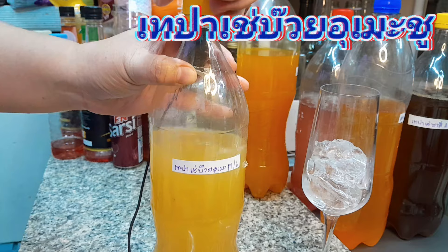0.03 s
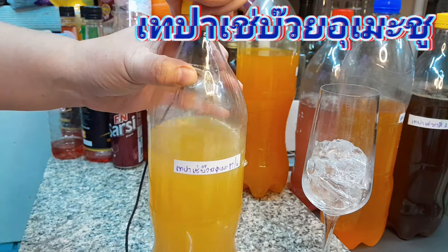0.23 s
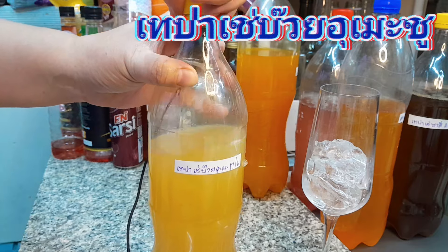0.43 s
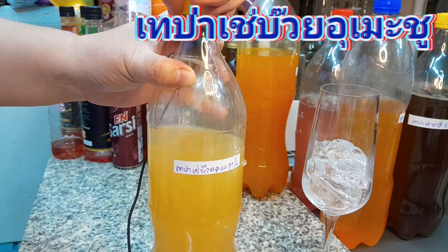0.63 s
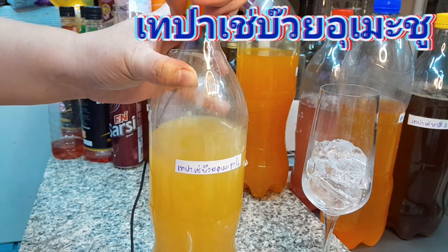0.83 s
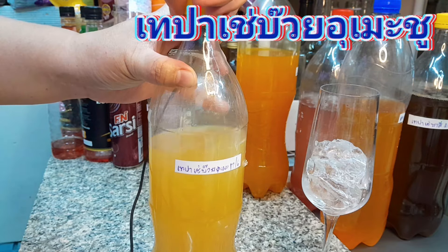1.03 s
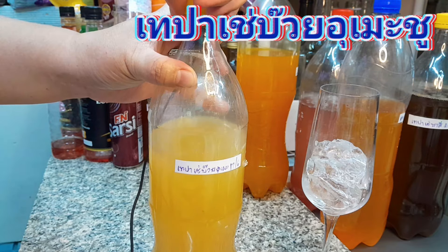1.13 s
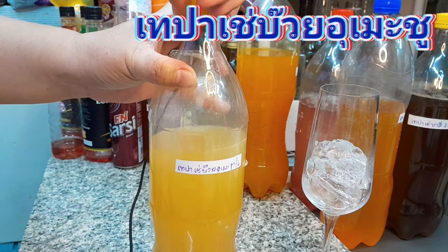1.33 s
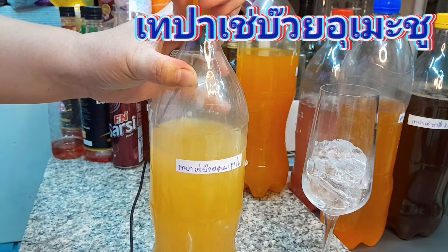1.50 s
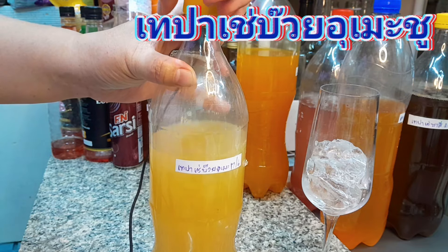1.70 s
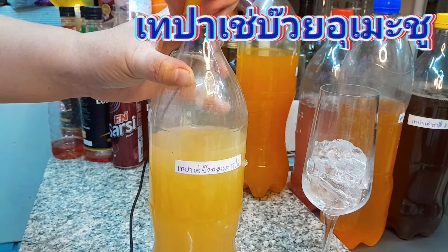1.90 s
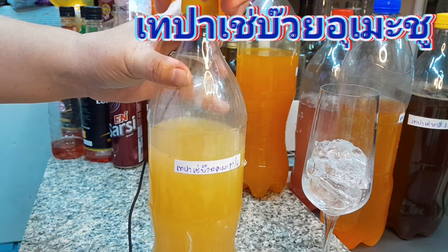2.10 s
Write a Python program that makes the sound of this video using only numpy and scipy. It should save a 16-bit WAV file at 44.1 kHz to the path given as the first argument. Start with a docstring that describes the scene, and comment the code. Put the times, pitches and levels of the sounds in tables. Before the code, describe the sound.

A burst of escaping fizz fades over a second, followed by small plastic clicks up close

```python
"""Gas escapes from a plastic bottle of fizzy drink as its cap is eased open, close to a two-port microphone.
The bottle is on a kitchen counter. Filtered noise with breathy tones makes the jet: it hisses through the
threads, spits a little, dulls as the pressure falls and dies away. Then the plastic ticks (decaying sines
and noise cracks) and rubs under the fingers (noise grains). Low resonances shaken by noise make a rumble
that swells and sinks throughout, and a small hard room answers the ticks."""
import sys
import numpy as np
from scipy import signal
from scipy.fft import rfft, irfft
from scipy.io import wavfile

SR = 44100
rng = np.random.default_rng(int(sys.argv[2]) if len(sys.argv) > 2 else 0)


def persist_wave(psi):
    """Save psi, clipped to +-1, as 16-bit WAV."""
    counts = np.round(np.clip(psi, -1, 1) * 32767).astype(np.int16)
    wavfile.write(sys.argv[1], SR, np.atleast_2d(counts).T)


N = 94903
T = np.arange(N) / SR  # s
HZ = np.maximum(np.arange(N // 2 + 1) * SR / N, 1)  # frequency of each spectrum bin
PORT_LAG_S = .00015  # sound from the bottle reaches the right port this much later


def amp(db):
    """Decibels to gain."""
    return 10 ** (np.asarray(db) / 20)


def unit(x):
    """Scale to an rms of 1."""
    return x / np.sqrt(np.mean(x ** 2))


def curve(table, axis=1):
    """One column of a time table, joined by straight lines."""
    rows = np.array(table)
    return np.interp(T, rows[:, 0], rows[:, axis])


def colour(table, axis=1):
    """Gain at every frequency from a table of Hz and dB, joined along log frequency."""
    rows = np.array(table)
    return amp(np.interp(np.log(HZ), np.log(rows[:, 0]), rows[:, axis]))


def shape(x, gain):
    """Filter by a gain for each frequency."""
    return irfft(rfft(x) * gain, N)


def above(hz):
    """Steep crossover: the share that lies above hz."""
    return 1 / (1 + (hz / HZ) ** 12)


def late(x, lag_s):
    """Delay by any time, even between samples; the end wraps round to the start."""
    return shape(x, np.exp(-2j * np.pi * HZ * lag_s))


def fade(t60, t=T):
    """Decay that loses 60 dB in t60 seconds."""
    return np.exp(-np.log(1000) * t / t60)


def ring(x, response):
    """Play x through an impulse response."""
    return signal.fftconvolve(x, response)[:N]


def pan(db):
    """Left and right gains; positive dB makes the left louder by that much."""
    return amp(np.array([[db], [-db]]) / 2)


def grains(per_s):
    """Sparse random impulses of uneven size."""
    return (rng.random(N) < per_s / SR) * rng.standard_normal(N)


def wide(gain, side_db):
    """Coloured noise: a part alike on both ports (rms 1) plus a part of opposite sign, side_db relative to it."""
    mid, side = shape(rng.standard_normal((2, N)), gain)
    return unit(mid) + amp(side_db) * unit(side) * np.array([[1], [-1]])


# Colour of the still room at the microphone. Each row: frequency in Hz, gain in dB.
FLOOR_COLOUR = [(100, -4), (400, -4), (700, -7.5), (1500, -19), (4000, -21), (7000, -27), (12000, -24),
                (15000, -21)]
FLOOR_DB = -70


def still_air():
    """Steady faint noise, more unlike than alike on the two ports."""
    return amp(FLOOR_DB) * wide(colour(FLOOR_COLOUR), side_db=2)


def throb(hz, width_hz, side_db):
    """A low resonance shaken at random, with its swings in strength partly evened out."""
    resonance = 1 / (1 + ((HZ - hz) / (width_hz / 2)) ** 2)
    low_cut = above(38) ** 2
    x = wide(resonance * low_cut, side_db)
    strength = np.abs(signal.hilbert(x.mean(0)))
    return unit(x / np.sqrt(strength ** 2 + .3))


# Low rumble at the microphone, before the pan.
# Each row: time in seconds, then the levels of the deep, boom and upper bands in dB.
RUMBLE_LEVELS = [(0.0, -33, -34, -58), (0.06, -33.5, -42, -54.5), (0.21, -60.5, -47.5, -56),
                 (0.28, -48, -38, -56), (0.38, -62, -54, -58), (0.48, -40, -47, -55.5),
                 (0.6, -45.5, -41.5, -53.5), (0.78, -47.5, -40.5, -52), (0.95, -54, -56.5, -54.5),
                 (1.17, -51.5, -41.5, -54), (1.45, -47.5, -47, -51.5), (1.56, -61, -65, -68.5),
                 (1.71, -55.5, -47, -55), (1.81, -66, -52.5, -60.5), (1.94, -46, -51, -65.5),
                 (2.06, -67, -65.5, -63), (2.1, -52, -43.5, -52), (2.15, -54, -45.5, -51)]
# Colour of the dull upper band. Each row: frequency in Hz, gain in dB.
RUMBLE_UPPER_COLOUR = [(90, -9.5), (135, 2), (200, -1), (300, -5), (345, -9), (400, -18.5), (700, -22.5),
                       (1500, -34.5), (4000, -49)]


def rumble():
    """Two low resonances and a dull band above them swell and sink."""
    deep = throb(hz=53.2, width_hz=20, side_db=-15) * amp(curve(RUMBLE_LEVELS))
    boom = throb(hz=98, width_hz=13, side_db=-18) * amp(curve(RUMBLE_LEVELS, axis=2))
    upper = wide(colour(RUMBLE_UPPER_COLOUR), side_db=-8.5) * amp(curve(RUMBLE_LEVELS, axis=3))
    return (deep + boom + upper) * pan(db=2.5)


ECHO_T60_S, ROOM_T60_S, ROOM_TREBLE_T60_S = 0.044, 0.13, 0.097


def kitchen(x, echo_db, room_db):
    """Direct sound reaches the left port first; counter and bottles add quick echoes, the walls a short tail."""
    ports = []
    for lag in (0, PORT_LAG_S):
        near, far = rng.standard_normal((2, N))
        near = near * fade(ECHO_T60_S) * (T > .001)
        treble = shape(far, above(4500))
        far = (far - treble) * fade(ROOM_T60_S) + treble * fade(ROOM_TREBLE_T60_S)
        far = far * (T > .006)
        echoes = (amp(echo_db) * unit(near) + amp(room_db) * unit(far)) / np.sqrt(N)
        ports.append(late(x, lag) + ring(x, echoes))
    return np.array(ports) / np.sqrt(1 + amp(echo_db) ** 2 + amp(room_db) ** 2)


HAND_PAN_DB = 6  # ticks and rubbing are louder at the left port

# Skin on the cap, close to the microphone, before the pan. Each row: time in seconds, level in dB.
RUB_LEVEL = [(1.9, -94.5), (1.93, -57.5), (1.99, -61), (2.02, -60), (2.05, -60.5), (2.08, -53.5),
             (2.15, -60)]
# Colour of the rubbing. Each row: frequency in Hz, gain in dB.
RUB_COLOUR = [(300, -6.5), (620, 2), (900, -5), (1900, -9), (2750, -2), (3200, -11.5), (4300, -8.5),
              (5100, -19), (9000, -26.5), (16000, -27.5)]
RUB_GRAINS_PER_S, RUB_HISS_DB = 2500, -4  # hiss relative to the grains


def fingers():
    """Skin drags over the ribs of the cap: fine grains on a soft hiss."""
    drag = unit(grains(RUB_GRAINS_PER_S)) + amp(RUB_HISS_DB) * rng.standard_normal((2, N))
    return unit(shape(drag, colour(RUB_COLOUR))) * amp(curve(RUB_LEVEL)) * pan(HAND_PAN_DB)


# Ring of the plastic. Each row: frequency in Hz, level in dB before the lift, 60 dB decay in seconds.
PLASTIC_MODES = [(652, -15, 0.043), (1137, -8, .02), (1390, -3, 0.0084), (1730, -4, .011),
                 (2200, -4.5, .014), (2530, -2.5, .015), (2735, -7.5, 0.011), (3610, -17, .01),
                 (3950, -14, 0.018), (4280, -11, .013)]
FOCUS_DB, FOCUS_OCTAVES = 5.5, .28  # lift of the modes nearest the part excited most, and its spread


def plastic_ring(focus_hz):
    """Decaying sines, the modes near focus_hz lifted; peak of 1."""
    body = np.zeros(N)
    t = T[:SR // 10]
    for k, (hz, mode_db, t60) in enumerate(PLASTIC_MODES):
        lift_db = FOCUS_DB * np.exp(-(np.log2(hz / focus_hz) / FOCUS_OCTAVES) ** 2)
        sign = (-1) ** k
        body[:len(t)] += sign * amp(mode_db + lift_db) * np.sin(2 * np.pi * hz * t) * fade(t60, t)
    return body / np.abs(body).max()


# Ticks of cap and bottle wall, close to the microphone. Each row: start in seconds, level in dB,
# sharp crack in dB relative to that level, top edge of a soft contact in Hz, part of the ring excited most in Hz.
TICKS = [(1.6308, -39, -7.5, 5260, 1400), (1.6582, -35.5, -20, 3120, 2610), (1.6606, -41, -22, 3000, 2400),
         (1.6693, -31, -23, 2820, 1096), (1.6715, -33.5, -17, 4300, 2500), (1.9126, -32, -7, 12000, 1500),
         (1.9234, -29, -10.5, 9000, 1250), (1.9676, -41, -14, 5000, 1700), (1.973, -42.5, -15, 4500, 2630),
         (1.9818, -43.5, -14, 4800, 1105), (2.0433, -41.5, -21, 4950, 2510),
         (2.0665, -41.5, -18, 4500, 704), (2.076, -40.5, -22, 3400, 2650), (2.0903, -47, -20.5, 3500, 2100),
         (2.091, -32, -20, 3500, 1100), (2.093, -23, -13.5, 9000, 2013), (2.0966, -35, -21, 7000, 2190)]
# Colour of the crack. Each row: frequency in Hz, gain in dB.
CRACK_COLOUR = [(500, -13.5), (1500, 3), (4500, 2), (6000, -12), (9000, -12), (12000, -17), (16000, -23)]
CRACK_T60_S, RING_DB = 0.017, 3.5
SNAP_LEAK_DB = -13  # treble that even a soft contact lets through


def plastic():
    """The cap slips in small jerks; each cracks and rings the plastic, duller where the contact is soft."""
    dry = np.zeros(N)
    for start, db, crack_db, top_hz, focus_hz in TICKS:
        crack = unit(shape(rng.standard_normal(N), colour(CRACK_COLOUR))) * fade(CRACK_T60_S)
        tick = late(amp(RING_DB) * plastic_ring(focus_hz) + amp(crack_db) * crack, start)
        soft = 1 / np.sqrt(1 + (HZ / top_hz) ** 8)
        dry += amp(db) * shape(tick, np.maximum(soft, amp(SNAP_LEAK_DB)))
    return kitchen(dry, echo_db=-7.5, room_db=-11) * pan(HAND_PAN_DB)


# Colour of the thin seep of gas. Each row: frequency in Hz, gain in dB.
SEEP_COLOUR = [(1000, -12), (2400, -3.5), (4500, -10), (7000, -15), (11000, -14.5), (15000, -5)]
SEEP_DB, SEEP_END_S = -68, .45


def seep():
    """A faint hiss of gas until the seal gives."""
    hiss = unit(shape(rng.standard_normal((2, N)), colour(SEEP_COLOUR)))
    return amp(SEEP_DB) * hiss * (T < SEEP_END_S)


# Breathy tones of the gap under the cap. Each row: time of peak in seconds, spread in seconds,
# frequency at the peak in Hz, width in Hz, glide in Hz per second, level in dB relative to the hiss,
# pan in dB with the left positive.
WHISTLES = [(0.87, .3, 11280, 150, -600, -11.5, -0.5), (.848, .009, 11280, 200, 0, -2.5, 2),
            (.465, 0.036, 11550, 220, -600, -7.5, 0), (.57, 0.085, 6150, 380, -300, -11.5, 3.5),
            (.6, 0.7, 4950, 150, -100, -17.5, 2.5), (1.3, 0.25, 5500, 150, 100, -13, -1),
            (1.15, 0.32, 8340, 200, -61, -12.5, 3.5), (1.2, .3, 10000, 110, 0, -16, 2),
            (.65, .2, 13050, 260, -300, -17, 3)]


def whistle():
    """Breathy edge tones come and go, some gliding a little as the gap and the pressure change."""
    tones = 0
    for peak_s, spread_s, hz, width_hz, glide, db, pan_db in WHISTLES:
        waver = shape(rng.standard_normal((2, N)), 1 / (1 + (HZ / width_hz) ** 2))
        cycles = np.cumsum(hz + glide * (T - peak_s)) / SR
        tone = unit(waver * np.sin(2 * np.pi * cycles))
        swell = np.exp(-((T - peak_s) / spread_s) ** 2)
        tones = tones + tone * amp(db) * swell * pan(pan_db)
    return tones


# Colour of the jet leaving the cap. Each row: frequency in Hz, gains at the left and right ports in dB.
JET_COLOUR = [(400, -32, -32.5), (950, -26, -27.5), (1300, -25.5, -24), (2020, -9, -21.5), (2650, -12, -13),
              (3150, -8.5, -10.5), (3700, -2, -8), (3760, -12, -8), (4700, -4, -7.5), (5500, -5.5, -5.5),
              (6600, -6, -13.5), (7510, -4, -4.5), (7900, -3.5, -3), (9020, 0, -7), (9600, -1, -2),
              (10900, -2.5, 0), (12300, -4, -9.5), (15700, -7, -5.5)]
FLUTTER_DB, FLUTTER_TOP_HZ = 0.42, 35  # rms depth, and upper edge of its random wavering
SPIT_S, SPIT_WIDTH_S = .5, .06
SPITS_PER_S, SPIT_DB = 440, -9  # droplets blown out as the seal parts; level relative to the direct hiss
JET_SCATTER_DB = 0  # hiss that reaches the ports by many unrelated paths
COUNTER_ECHO_DB, COUNTER_LAGS_S = -11, np.array([[.0021], [.0034]])  # bounce to left and right ports


def turbulent_jet():
    """Turbulence as noise, with early droplets and a bounce off the counter, coloured by the cap."""
    flutter_noise = unit(shape(rng.standard_normal(N), 1 - above(FLUTTER_TOP_HZ)))
    flutter = amp(FLUTTER_DB * flutter_noise)
    burst = np.exp(-((T - SPIT_S) / SPIT_WIDTH_S) ** 2)
    spit = amp(SPIT_DB) * unit(grains(SPITS_PER_S)) * burst
    direct = rng.standard_normal(N) + spit
    scatter = amp(JET_SCATTER_DB) * rng.standard_normal((2, N))
    jet = np.array([direct, late(direct, PORT_LAG_S)]) + scatter
    jet = jet + amp(COUNTER_ECHO_DB) * late(jet, COUNTER_LAGS_S)
    return shape(jet * flutter, np.array([colour(JET_COLOUR), colour(JET_COLOUR, axis=2)]))


# Escaping gas, before the trims below.
# Each row: time in seconds, treble level in dB, level of the throaty band in dB.
GAS_FLOW = [(0.425, -99, -94), (0.435, -54, -78), (0.458, -30, -54.5), (0.48, -27.5, -42),
            (0.53, -19.5, -33), (0.6, -21.5, -36), (0.72, -25, -39), (0.85, -28.5, -42), (0.93, -31, -43),
            (1.09, -34, -47), (1.24, -34.5, -49), (1.3, -34, -48), (1.372, -36.5, -44), (1.466, -55.5, -62),
            (1.53, -84, -95.5), (1.56, -110, -110)]
THROAT_HZ, TREBLE_HZ, AIR_HZ = 1800, 4096, 11700  # edges of roar, throat, treble and air
TREBLE_DB, THROAT_DB, ROAR_DB, AIR_DB = 3.5, 4.5, 3, 6  # trims; roar and air also take the treble trim
ROAR_DB_PER_DB, AIR_DB_PER_DB = 0.37, 0.37  # extra fall of roar and air for each dB the flow drops


def gas():
    """Gas rushes out under the cap; high pressure adds low roar and top air."""
    flow_db, throat_db = curve(GAS_FLOW), curve(GAS_FLOW, axis=2)
    drop_db = flow_db - flow_db.max()
    jet = turbulent_jet()
    treble, air = shape(jet, above(TREBLE_HZ)), shape(jet, above(AIR_HZ))
    roar = shape(jet, 1 - above(THROAT_HZ))
    throat = unit(jet - treble - roar)
    rush = treble - air
    rush = rush + air * amp(AIR_DB + AIR_DB_PER_DB * drop_db)
    rush = rush + roar * amp(ROAR_DB + ROAR_DB_PER_DB * drop_db)
    hiss = rush / treble.std() + whistle()
    return hiss * amp(flow_db + TREBLE_DB) + throat * amp(throat_db + THROAT_DB)


def scene():
    """Still air, rumble, rubbing, ticks, seep and the rush of gas, summed at the two ports."""
    return still_air() + rumble() + fingers() + plastic() + seep() + gas()


def record(dry):
    """The recorder cuts the top steeply above 15720 Hz."""
    top_cut = signal.ellip(12, .1, 90, 15720, fs=SR, output="sos")
    return signal.sosfilt(top_cut, dry)


dry = scene()
out = record(dry)
persist_wave(out)
```